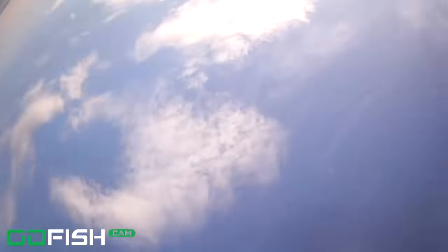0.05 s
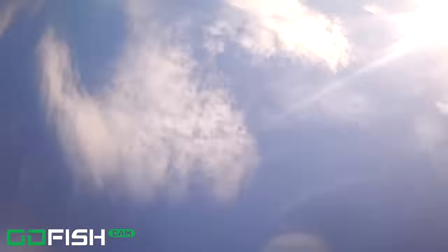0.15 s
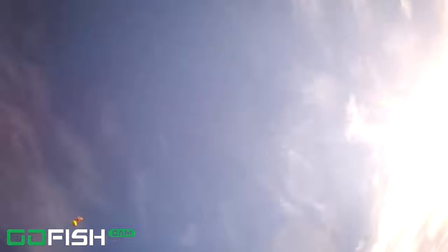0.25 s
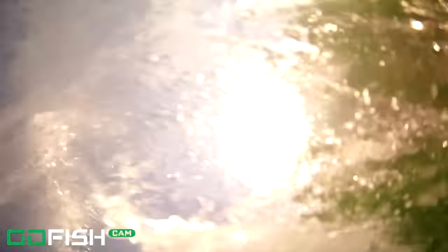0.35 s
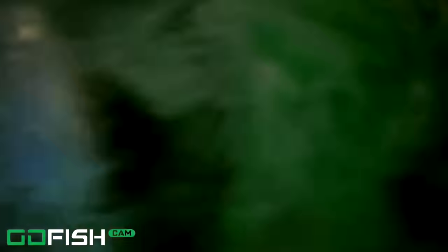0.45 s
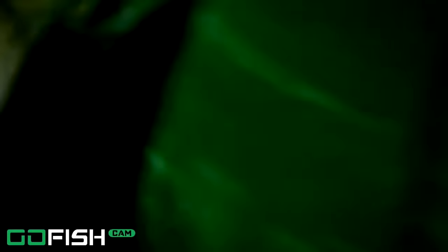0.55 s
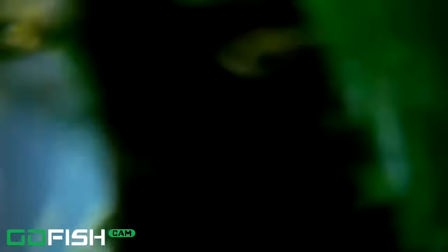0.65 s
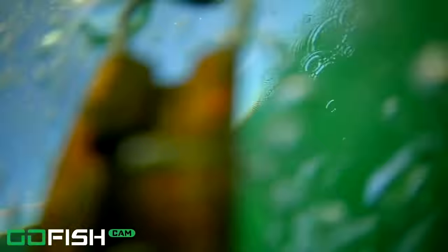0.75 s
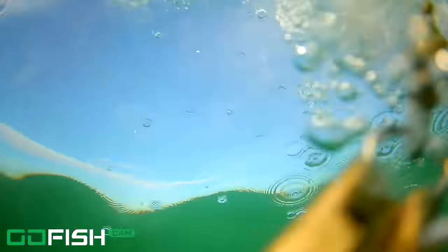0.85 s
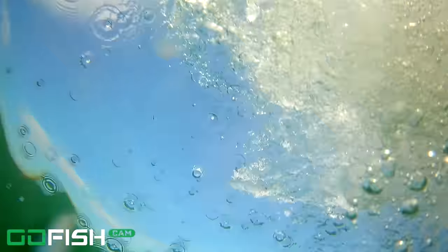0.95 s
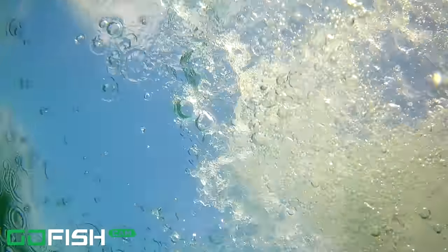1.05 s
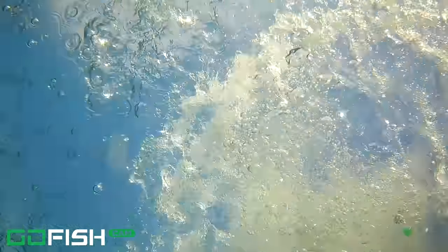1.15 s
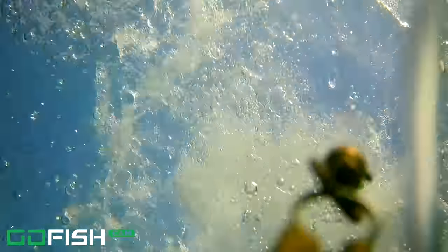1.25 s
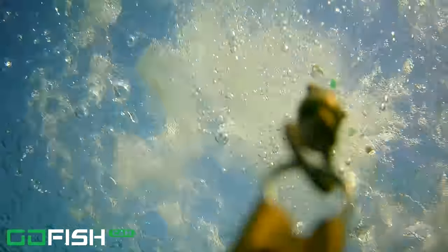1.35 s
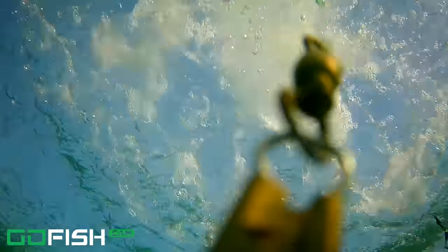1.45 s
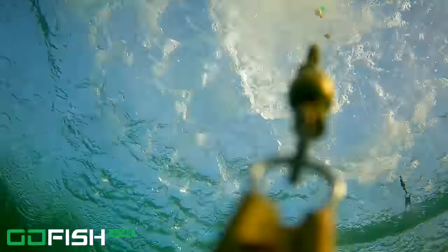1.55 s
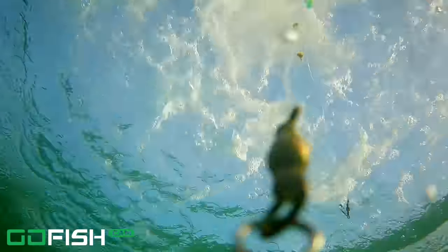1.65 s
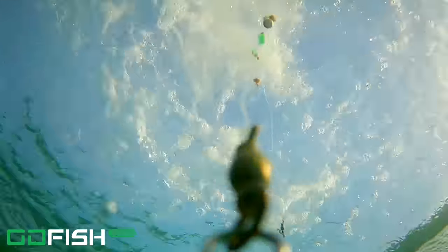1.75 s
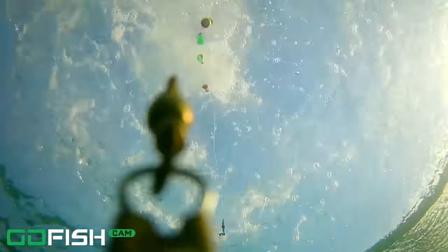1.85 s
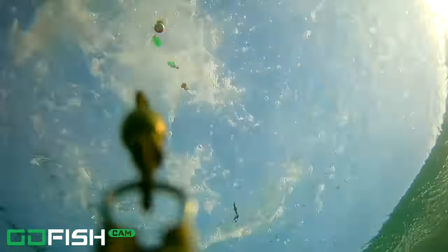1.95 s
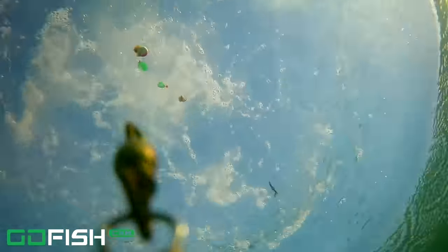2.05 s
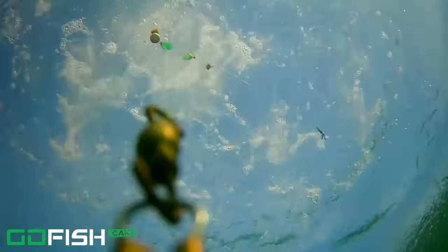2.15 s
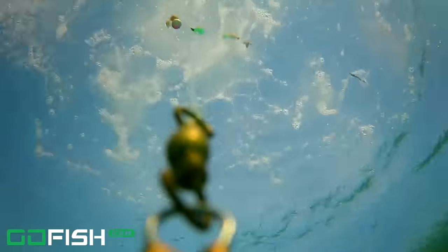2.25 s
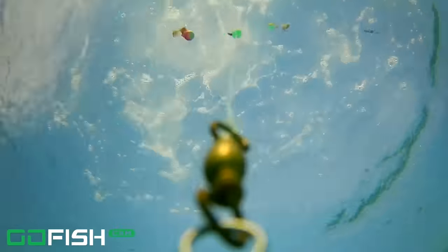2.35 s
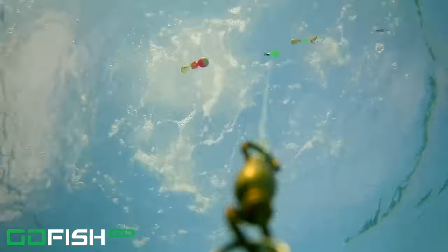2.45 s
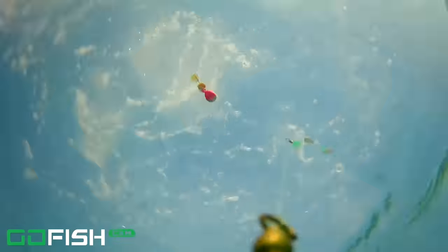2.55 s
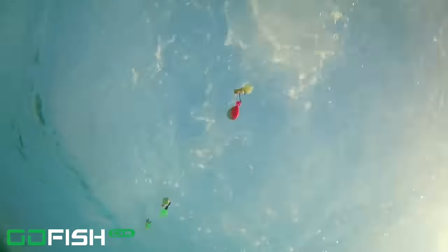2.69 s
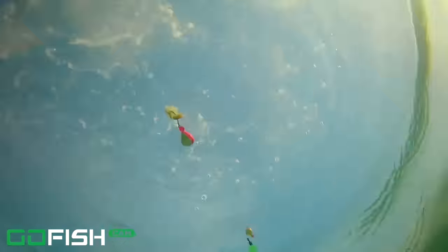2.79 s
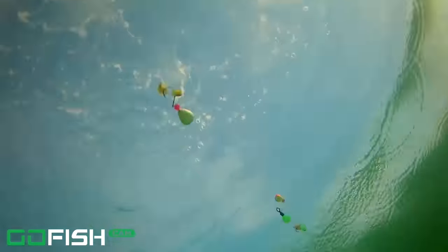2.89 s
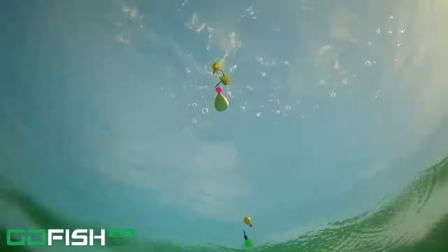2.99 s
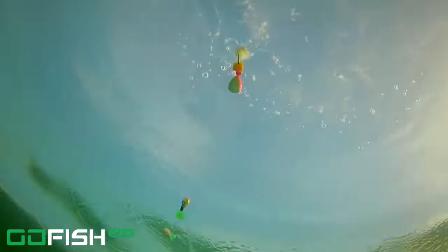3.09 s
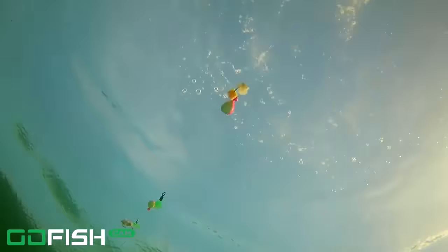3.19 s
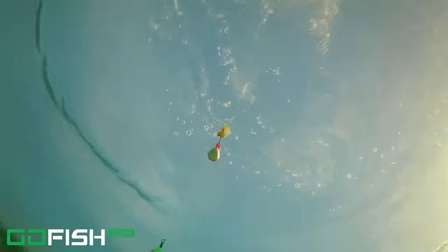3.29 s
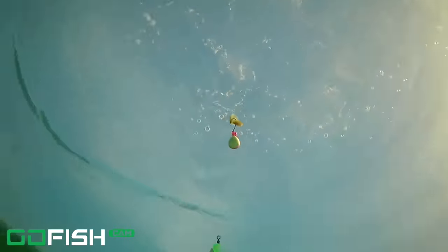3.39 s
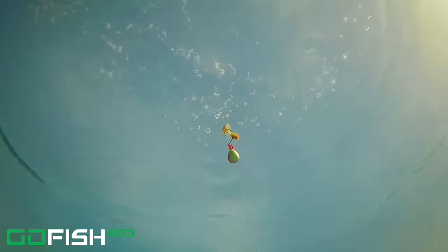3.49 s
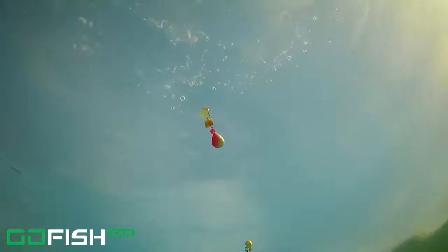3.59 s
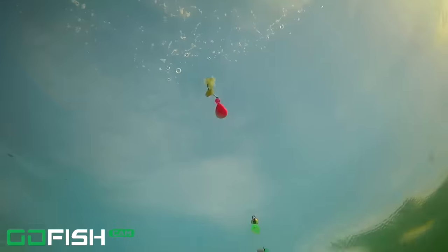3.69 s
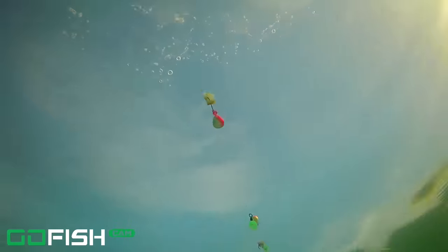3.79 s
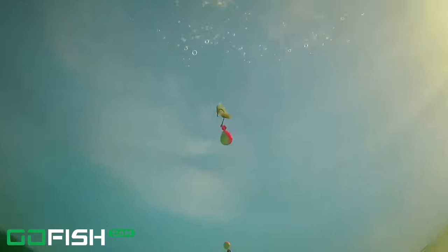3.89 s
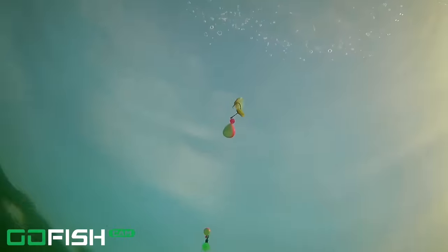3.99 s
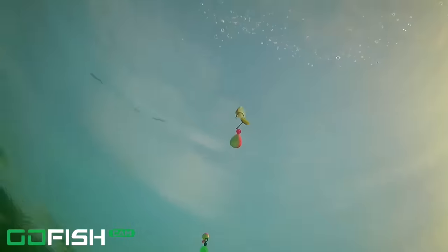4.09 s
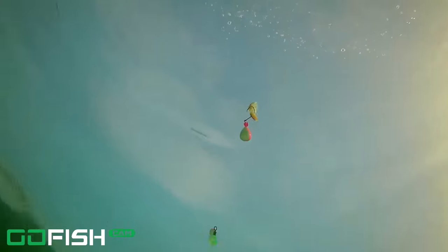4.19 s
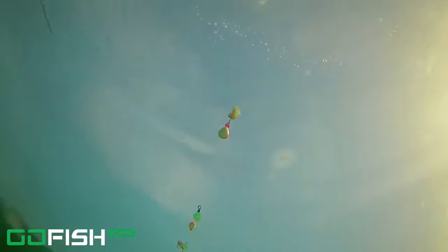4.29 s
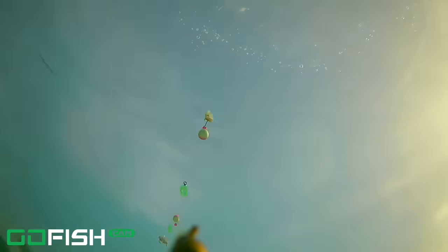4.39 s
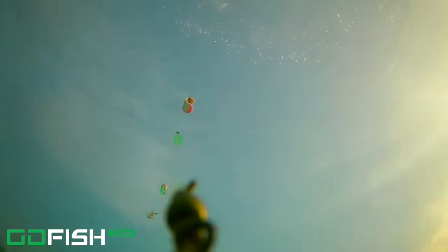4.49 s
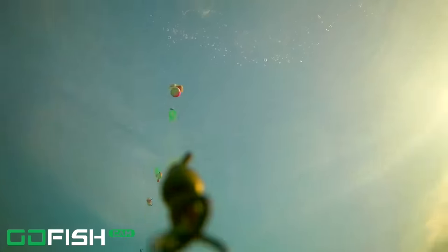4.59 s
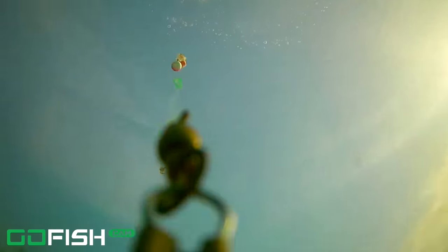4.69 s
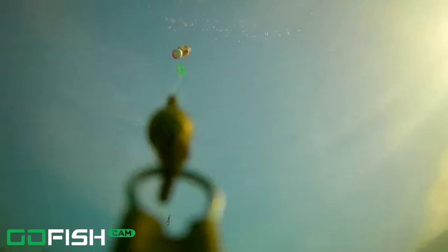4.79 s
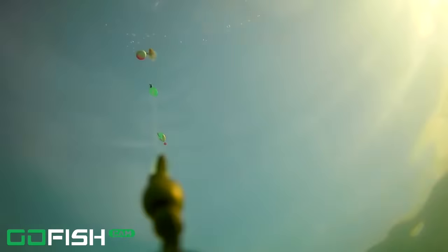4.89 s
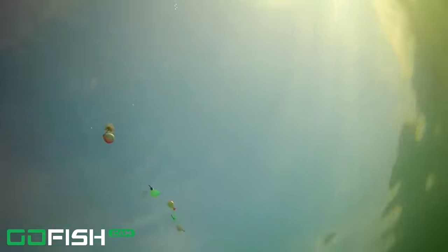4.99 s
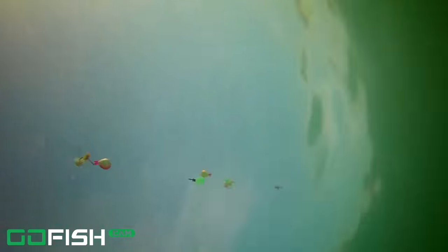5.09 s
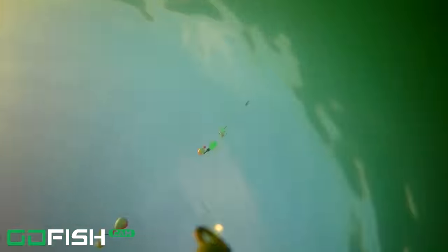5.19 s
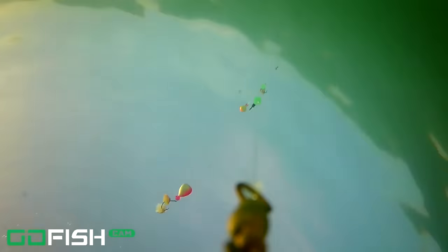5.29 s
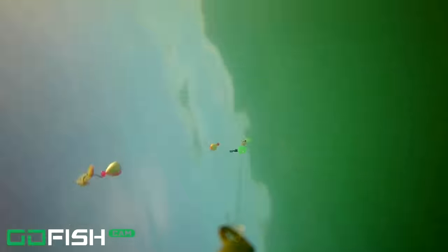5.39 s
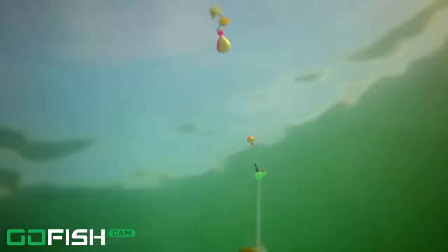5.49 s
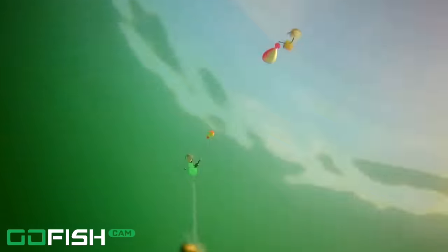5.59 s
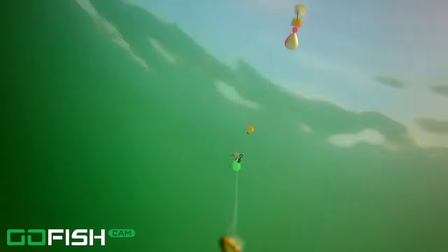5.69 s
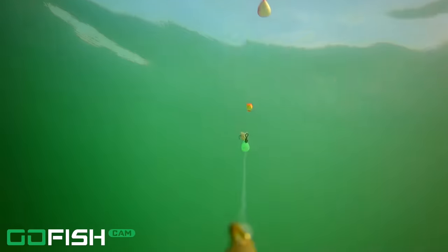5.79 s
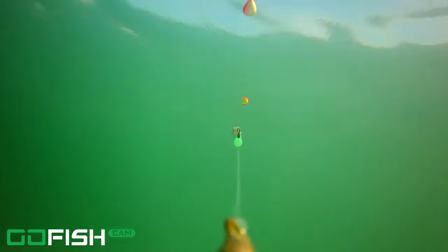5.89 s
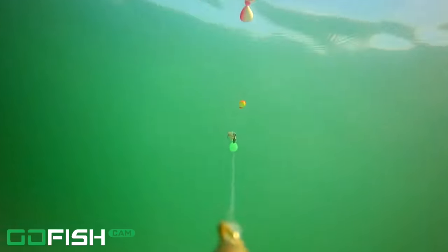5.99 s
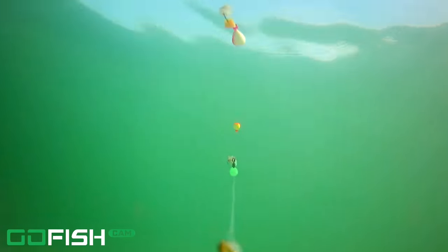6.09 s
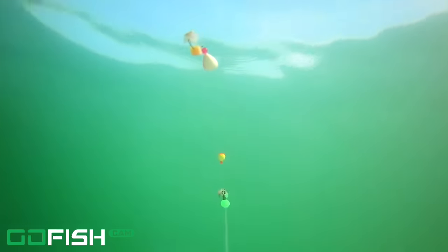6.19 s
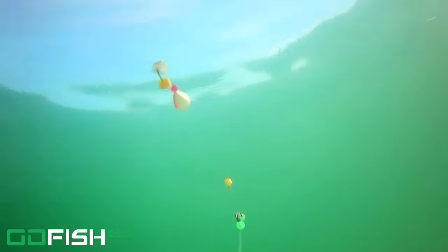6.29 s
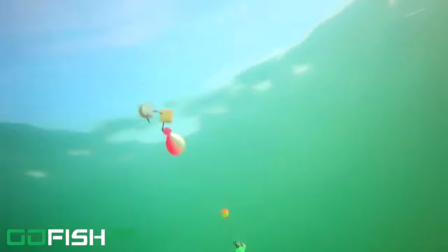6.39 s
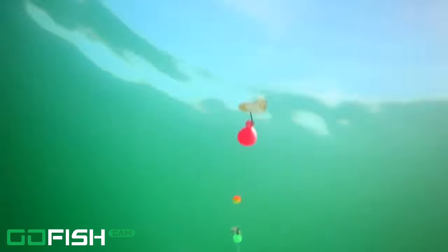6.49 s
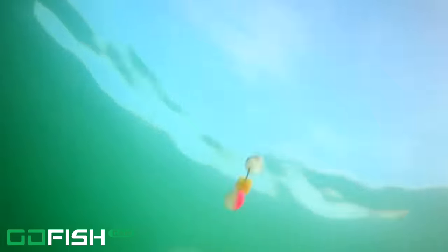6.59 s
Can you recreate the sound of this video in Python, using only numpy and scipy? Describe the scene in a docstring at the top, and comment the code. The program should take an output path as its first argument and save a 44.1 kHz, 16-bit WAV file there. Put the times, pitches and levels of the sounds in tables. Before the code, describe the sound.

Hard clinks and rushing air, a watery plunge with bubbling foam, then creaking line and small metal clicks heard from inside a sinking shell.

```python
"""Tackle and water knock on the shell of a small fishing camera, cast on a line into surf and left to sink.
Blows are short pings over a chatter that rings swivel or shell; the flight is a rush over a low rumble, the foam
a rush, a swarm of tiny bubbles and a low churn. A pitch-swept air pocket marks the plunge, damped rings the larger
bubbles; later the taut rig creaks in stick-slip impulses and its brass swivel scrapes on the shell. The microphone,
shut inside, hears little treble from outside over its own hiss; it backs off after loud sounds and hard blows clip."""
import sys
import numpy as np
from scipy import signal
from scipy.fft import rfft, irfft, next_fast_len
from scipy.io import wavfile
from scipy.ndimage import map_coordinates

SR = 44100
rng = np.random.default_rng(int(sys.argv[2]) if len(sys.argv) > 2 else 0)


def to_wav(s):
    """Save 16-bit WAV."""
    ch = np.atleast_2d(s).T  # columns
    pcm = np.round(np.clip(ch, -1, 1) * 32767)  # PCM
    wavfile.write(sys.argv[1], SR, pcm.astype(np.int16))


N = 293265

# resonances of the housing shell: f/Hz, width/Hz, level/dB
SHELL_MODES = [(730, 150, -13.5), (1283, 73, 1.5), (1555, 45, -1), (1932, 140, 1.5), (2107, 94, 5.5),
               (2330, 140, 1), (2767, 86, -1), (3204, 81, -3), (3450, 77, -13), (4390, 670, -14.5),
               (4860, 210, -12), (5150, 380, -18)]
# resonances of the swivel and its clip: f/Hz, width/Hz, level/dB
SWIVEL_MODES = [(1348, 270, -1.5), (1562, 95, 5), (1816, 240, -3), (2260, 116.78, 1.5), (2920, 130, -4.5),
                (3080, 200, -2), (3520, 240, -4), (3940, 12, -11.5), (4250, 68, -11.5), (4734.4, 200, -8),
                (4970, 560, -18)]
# spectrum of the rush and of the slap at the plunge: f/Hz, level/dB
FOAM_SPECTRUM = [(400, -36), (750, -33.5), (950, -8), (1200, 2.5), (1600, 3), (2300, -6), (3200, -3),
                 (4300, -2.5), (4900, -15), (5500, -14.5), (6300, -22), (9000, -19), (13000, -10)]
# small parts radiate little bass: f/Hz, gain/dB
SMALL_PARTS = [(100, -41), (500, -10.5), (900, -12), (1250, -0.5), (5000, 1), (7000, -1.5)]


def amp(db):
    """Decibels to gain."""
    return 10 ** (np.asarray(db) / 20)


def unit(x):
    """Scale to rms 1."""
    return x / np.sqrt(np.mean(x ** 2) + 1e-20)


def curves(rows):
    """One value per sample for each column after the time."""
    s, *columns = np.transpose(rows)
    return [np.interp(np.arange(N) / SR, s, column) for column in columns]


def loudness(rows):
    """Gain per sample from the last column (dB), silent outside the rows' span."""
    t = np.arange(N) / SR
    return amp(curves(rows)[-1]) * (t >= rows[0][0]) * (t <= rows[-1][0])


def wobble(rate):
    """A smooth random curve, rate knots a second."""
    knots = rng.standard_normal(int(N * rate / SR) + 4)
    return map_coordinates(knots, [np.arange(N) * rate / SR])


def add(track, s, sound):
    """Mix a sound into the track at time s."""
    part = track[max(round(s * SR), 0):][:len(sound)]
    part += sound[:len(part)]


def colour(x, points, size=4096):
    """Causal minimum-phase filter with the gain of (Hz, dB) points."""
    hz, db = np.transpose(points)
    gain = amp(np.interp(np.log(np.fft.rfftfreq(size, 1 / SR) + 1), np.log(hz), db))
    # folding the cepstrum forward in time makes the filter minimum-phase
    cepstrum = irfft(np.log(np.maximum(gain, 1e-6)))
    cepstrum[1:size // 2] *= 2
    cepstrum[size // 2 + 1:] = 0
    impulse = irfft(np.exp(rfft(cepstrum)))
    return signal.fftconvolve(x, impulse)[:N]


def resonate(x, modes, size=8192):
    """Ring a body's resonances, keeping the power of a white input."""
    f = np.fft.rfftfreq(size, 1 / SR)
    response = 0
    for k, (centre, width, db) in enumerate(modes):
        band = 1j * f * width / (centre * centre - f * f + 1j * f * width)
        response = response + (-1) ** k * amp(db) * band  # neighbours have opposite signs
    ring = irfft(response)
    return signal.fftconvolve(x, ring / np.linalg.norm(ring))[:N]


def blend(a, b, share):
    """Equal-power mix that gives b the stated share."""
    share = np.clip(share, 0, 1)
    return np.sqrt(1 - share) * a + np.sqrt(share) * b


def swell(start, length, db, rise, fade):
    """Gain that rises, holds and fades; rise and fade are the seconds for 20 dB."""
    t = np.arange(N) / SR
    before = np.maximum(start - t, 0) / rise
    after = np.maximum(t - start - length, 0) / fade
    return amp(db - 20 * (before + after))


def strokes(rows, rise, fade):
    """One gain curve for each (start, length, dB) row."""
    return np.array([swell(*row[:3], rise, fade) for row in rows])


def bubble(t, hz, t60, rise):
    """A damped ring scaled by its envelope peak, with a soft start and a pitch that rises as it fades."""
    envelope = amp(-60 * t / t60) * (1 - np.exp(-t * hz / 2)) ** 2
    envelope = envelope / envelope.max(axis=-1, keepdims=True)
    return envelope * np.sin(2 * np.pi * hz * t * (1 + rise * np.minimum(t / t60, 1)))


def grains(at, size, hz, cycles, rise):
    """Sum short rings that start at the given samples, each with its own size and pitch."""
    t = np.arange(SR // 80) / SR
    hz = np.clip(hz, 700, 6000)[:, None]
    rings = size[:, None] * bubble(t, hz, cycles / hz, rise)
    where = at[:, None] + np.arange(len(t))
    return np.bincount(where.ravel(), rings.ravel(), N)[:N]


def floor(hiss_db=-51.5, murmur_db=0, murmur_hz=525, drift=.05):
    """A faint hollow hum wavers in pitch and level near 500 Hz under an even hiss."""
    # spectrum of the hiss: f/Hz, level/dB
    hiss_spectrum = [(25, -59), (60, -28), (120, -21), (250, -7.5), (400, -5.5), (520, -3), (700, -7),
                     (1000, -11.5), (2000, -12.5), (3700, -14), (5500, -20), (10000, -19.5), (16000, -18)]
    # level of the hum: t/s, level/dB
    hum_level = [(.9, -60.5), (2.1, -56.5), (2.6, -63), (4.0, -64.5), (4.45, -56), (4.9, -66), (5.6, -56.5),
                 (6.65, -63.5)]
    hiss = amp(hiss_db) * unit(colour(rng.standard_normal(N), hiss_spectrum))
    phase = 2 * np.pi * np.cumsum(murmur_hz * (1 + drift * wobble(10))) / SR
    murmur = unit(wobble(85) * np.sin(phase) + wobble(85) * np.cos(phase))
    return hiss + amp(murmur_db + curves(hum_level)[0]) * murmur


def foam(count=6000, size_db=5.5, cycles=10, foam_db=0, breaking_db=-25, churn_db=2):
    """The rush of flight and splash, then foam: tiny ringing bubbles and a rush, with a low rumble or churn beneath."""
    # wind and line rushing in flight, the splash, then clouds of foam:
    # peak t/s, level/dB, rise/s and fade/s over 20 dB
    surges = [(.005, -27, 0.026, 0.2), (.07, -31.5, 0.038, 0.56), (0.207, -26.5, 0.16, .1),
              (0.314, -24.5, 0.026, 0.1), (.44, -19, 0.17, 0.18), (0.544, -14, 0.33, 0.1246),
              (.645, -23.5, 0.24, 0.19), (.755, -27, 0.2, .02), (.935, -31, 0.12, 0.04),
              (1.001, -29.5, 0.034, 0.09), (1.09, -32, 0.11, 0.14), (1.39, -45, 0.26, 0.77),
              (1.86, -43, .18, 0.14), (2.059, -45.5, .06, 0.2)]
    # low rumble in flight, then heavy water tumbling round the shell: start t/s, length/s, level/dB
    churns = [(0, 0.22, -48.5), (.47, 0.097, -32), (.6, .15, -39.5), (2.8, 0.06082, -55),
              (3.62, 0.057, -53.5), (5.42, 0.07, -52.5), (6.3, 0.11, -54)]
    # spectrum of the rumble and churn: f/Hz, level/dB
    churn_spectrum = [(50, -48), (130, -11.5), (300, 0.5), (600, 4.5), (900, -1), (1400, -22)]
    size = amp(size_db * np.minimum(rng.exponential(size=count), 2.6))
    pitch = 2250 * np.exp(0.25 * rng.standard_normal(count))  # Hz
    swarm = grains(rng.integers(0, N, count), size, pitch, cycles, rise=0.02)
    rush = unit(colour(rng.standard_normal(N) * amp(6.8 * wobble(250)), FOAM_SPECTRUM))
    level = np.max([swell(s, 0, db, rise, fade) for s, db, rise, fade in surges], axis=0)
    # loud surges lean toward the broad rush, gentle foam toward the bubbles
    mix = blend(unit(swarm), rush, level / (level + amp(breaking_db)))
    churn = unit(colour(rng.standard_normal(N) * amp(6.7 * wobble(60)), churn_spectrum))
    churn_level = amp(churn_db) * strokes(churns, rise=0.12, fade=0.051).max(0)
    return amp(foam_db) * level * mix + churn_level * churn


def ticks(start, end, rate, db, spread_db=3, spread=0.042):
    """Small contacts at random moments, as rows like those of the blows."""
    centre_hz, ring_db = 2180, -18
    count = round((end - start) * rate)
    rows = []
    for when, size, pitch in rng.random((count, 3)):
        hz = centre_hz * np.exp(spread * (2 * pitch - 1))
        rows.append((start + (end - start) * when, db + spread_db * (2 * size - 1), hz, ring_db))
    return rows


def clinks(contact_db=-.5, ring_db=1, ring_t60=0.03, chatter_rise=0.00064, grit=0.72, bounce_db=4,
           rebound_s=.0019, rebound_db=-6):
    """Each contact is a ping, shorter when harder, and a softer rebound, over a chatter that rings swivel or shell."""
    # clearest blows of tackle and water on the housing: t/s, level/dB, centre f/Hz, ring level/dB re ping
    blows = [(0.0863, -2, 3270, -13), (0.0896, -6.5, 3650, -33), (0.167, -18, 2050, -10),
             (0.1814, 2, 3760, -43), (0.2219, -1.5, 2980, -6.5), (0.2352, -3.5, 2550, -27),
             (.2573, -5.5, 3583, -31), (0.2683, -5.5, 2600, -29), (0.3249, 1, 2500, -20),
             (.3411, 2, 2450, -17), (0.3526, -4, 3380, -10), (0.3855, 0, 2500, -18), (.3875, 3, 3400, -24),
             (.444, -0.5, 2600, -3.5), (0.4461, 7, 2430, -25), (0.471, -12, 1940, 6),
             (0.4887, 3.5, 1870, -17), (0.529, 2.5, 2381, -11), (0.5361, 5.5, 3400, -18),
             (.5531, 5.5, 2440, -20), (.561, 1, 2340, -18), (.7357, -3.5, 3100, -17),
             (0.7689, 6, 2770, -21), (0.929, -14.5, 1610, -6), (.9765, -2, 2450, -20),
             (.9811, -11.5, 1760, -11), (1.164, -22, 2520, -20), (1.3088, -25, 2400, -16),
             (1.5814, -11, 2630, -15), (1.6335, -20, 2020, -20), (1.6579, -17, 3430, -21),
             (1.7594, -20, 2370, -19), (1.8074, -23, 2280, -19), (1.836, -25, 2320, -20),
             (2.0251, -20.5, 2110, -12), (2.2914, -13.5, 2380, -8.5), (2.3333, -7.5, 2670, -45),
             (2.348, -17.5, 1757, -28), (2.4282, -7, 2168, -9), (2.481, -13, 2280, -9),
             (2.6265, -8, 2464, -23), (2.7355, -5.5, 2513, -14), (2.9684, -12, 2092, -32),
             (3.0105, -7, 3125, -21), (3.0517, -7.5, 2185, -32), (3.0659, -8.5, 2370, -21),
             (3.1677, -19.5, 1895, -26), (3.3194, -15.5, 2514, -23), (3.539, -9.5, 2470, -19),
             (3.747, -19, 2080, -20), (3.9383, -15.5, 2082, -33.5), (4.1833, -15, 2165, -28),
             (4.2025, -12, 2410, -26), (4.213, -17.5, 2550, -21.5), (4.2497, -15.5, 1910, -6),
             (4.3317, -16, 2151, -17), (4.3436, -17, 1870, -20), (4.3531, -17, 2265, -12),
             (4.4218, -19.5, 1837, -6), (4.4357, -15, 1868, -11.5), (4.672, -13.5, 3020, 0.5),
             (4.6867, -1, 2455, -10.5), (4.6919, 0.5, 2232, -30), (4.7335, -12, 3220, -7),
             (4.746, -11, 2320, -21), (4.7611, -11.5, 2980, -10), (4.795, -6.5, 2850, -9),
             (4.8203, -15.5, 2473, -2), (4.853, -11.5, 1780, -40), (4.91, -4.5, 3490, -7),
             (5.0516, -5.5, 2056, -12), (5.0623, -7.5, 1797, -4), (5.094, -8, 2900, -6.5),
             (5.1405, -11.5, 2650, -2), (5.1098, -20, 3200, -10), (5.1531, -11.5, 4060, -7),
             (5.3826, -14, 2510, -30), (5.48, -7.5, 1507, -21), (5.5175, -2.5, 1960, -7),
             (5.5857, -14.5, 2570, -17), (6.1187, -15, 2200, -37), (6.2456, -14, 2220, -28),
             (6.2524, -13, 2180, -32), (6.2993, -16.5, 3600, -27), (6.3294, -10.5, 2130, -35),
             (6.3676, -11.5, 2050, -1.5), (6.403, -5, 2120, -3), (6.486, -14.5, 2100, -8),
             (6.4946, -12.5, 2070, 3), (6.5614, 2, 2330, -11), (6.6286, -3.5, 2430, -2)]
    # stray pops in the foam: from t/s, to t/s, pops a second, mean level/dB
    foam_pops = (1.15, 1.84, 13.5, -31.5)
    # small knocks of the loaded rig: from t/s, to t/s, knocks a second, mean level/dB
    rig_knocks = (2, 3.5, 10.5, -22)
    # the swivel comes to rest against the shell: t/s, share of contact 0-1
    lean = [(5.3, 0), (5.47, 1)]
    # swell time of a 0 dB blow; it shortens by a factor e for every contact_e_db more
    contact_s, contact_e_db = 0.00029, 27
    pings, chatter = np.zeros(N), np.zeros(N)
    t = np.arange(SR // 16) / SR
    for s, db, hz, tail_db in blows + ticks(*foam_pops) + ticks(*rig_knocks):
        u = t / (contact_s * np.exp(-db / contact_e_db))
        envelope = (u * np.exp(1 - u)) ** 1.76
        rebound_delay = rebound_s * (.5 + rng.random())
        for delay, loss_db in [(0, 0), (rebound_delay, rebound_db)]:
            phase = 2 * np.pi * (hz * t + rng.random())
            # random phase wander roughens the ping
            wander = np.interp(t, np.arange(0, .1, .0004), rng.standard_normal(250))
            ping = envelope * np.sin(phase + grit * wander)
            add(pings, s + delay, amp(db + contact_db + loss_db) * ping)
        uneven = np.interp(t, np.arange(0, .1, .002), rng.standard_normal(50))
        noise = unit(rng.standard_normal(len(t)) * amp(bounce_db * uneven))
        bounces = (1 - np.exp(-t / chatter_rise)) * noise
        add(chatter, s, amp(db + tail_db + ring_db - 60 * t / ring_t60) * bounces)
    ring = blend(resonate(chatter, SWIVEL_MODES), resonate(chatter, SHELL_MODES), curves(lean)[0])
    return colour(pings + ring, SMALL_PARTS)


def bubbles(rise=0.10797, bubbles_db=2):
    """Larger bubbles pinch off one by one, each a damped ring of rising pitch."""
    # single air bubbles: t/s, level/dB, starting f/Hz, t60/s
    single_bubbles = [(.389, -14.5, 725, 0.017), (.4, -9.5, 166, 0.045), (0.4134, 5, 1117, 0.013),
                      (.418, -23, 598, 0.16), (.472, -17.5, 434, 0.013), (0.474, -5.5, 1114, 0.016),
                      (.521, -16.5, 777, 0.012), (0.52, -34, 128, 0.22), (.5957, -11.5, 3850, 0.0031),
                      (0.619, -14.5, 1180, 0.0094), (.627, -31.5, 393, 0.037), (0.633, -18.5, 3740, 0.0047),
                      (.645, -19, 1880, 0.015), (.707, -29.5, 447, 0.026), (0.796, -7, 1354, 0.023),
                      (.814, -23, 3130, 0.014), (.858, -30, 4500, 0.013), (0.8706, -20, 1560, 0.0072),
                      (0.9038, -12.5, 1386, 0.0095), (0.9516, -18, 1473, 0.011),
                      (1.0451, -7.5, 3270, 0.006074), (.982, -21.5, 1610, 0.087), (1.077, -27, 1530, .08),
                      (1.075, -26, 2992, .012), (1.134, -23.5, 2540, 0.012), (5.062, -19, 1622, 0.06),
                      (5.092, -21, 1533, 0.063), (5.479, -21.5, 1314, 0.044)]
    out, t = np.zeros(N), np.arange(SR // 3) / SR
    for s, db, hz, t60 in single_bubbles:
        add(out, s, amp(db + bubbles_db) * bubble(t, hz, t60, rise))
    return out


def plunge(slap_db=-3, thump_db=2):
    """The shell slaps the water, is pushed back by it and drags down a pocket of air that rings."""
    # air pocket torn open, ringing lower as it grows, then collapsing: t/s, f/Hz, level/dB
    air_pocket = [(.3925, 4300, -25.5), (.394, 4012, 0), (.398, 2668, 10), (.403, 1862, 7), (.4052, 950, 4),
                  (.406, 119.4, 12), (.4075, 201, 8), (.409, 750, -1), (.413, 1017, -5.5), (.418, 595, -6)]
    # the water's push on the shell: t/s, level/dB
    thump_level = [(.394, -30), (.397, -10), (.407, -6), (.412, -4), (.42, -20), (.45, -61)]
    # spectrum of that push: f/Hz, level/dB
    push_spectrum = [(20, 16), (50, 3), (90, -12), (155, 11), (250, -14), (430, 4), (650, -5), (1200, -15)]
    hz, _ = curves(air_pocket)
    pocket = np.sin(2 * np.pi * np.cumsum(hz) / SR)
    slap = unit(colour(rng.standard_normal(N), FOAM_SPECTRUM))
    push = unit(colour(rng.standard_normal(N), push_spectrum))
    splash = loudness(air_pocket) * (pocket + amp(slap_db) * slap)
    return splash + amp(thump_db) * loudness(thump_level) * push


def slips(rate, scatter, size_db):
    """Stick-slip impulses of rms 1 at an uneven rate and of uneven size."""
    pace = rate * np.exp(scatter * wobble(150))
    # one impulse whenever the running count of slips passes a whole number
    lets_go = np.diff(np.floor(np.cumsum(pace) / SR), prepend=0) > 0
    size = amp(size_db * np.clip(rng.standard_normal(N), -2, 1.3)) / np.sqrt(rate)
    return unit(lets_go * size)


def twangs(train, centre_hz, spread, cycles):
    """Each slip sets off a short ring, its pitch scattered at random round a centre."""
    at = np.flatnonzero(train)
    pitch, sign = rng.standard_normal((2, len(at)))
    hz = centre_hz * np.exp(spread * pitch)
    rings = grains(at, train[at] * np.sign(sign), hz, cycles, rise=0)
    return unit(colour(rings, SMALL_PARTS))


def creak(creak_db=0, crisp_db=-27, waver_db=.8, scatter=2.8, firm_db=1.3, loose_db=9, firm_snap=0.17):
    """The loaded rig lets go in small slips, each a twang and a snap; looser pulls blur into sliding."""
    # the rig comes under load and slips: start t/s, length/s, level/dB, slips a second,
    # share of smooth sliding 0-1, share that rings the swivel 0-1
    pull_rows = [(2.25, .06, -44, 130, .25, .01), (2.35, .06, -38, 130, .2, 0),
                 (2.45, .13, -28, 190, .28, 0.01), (2.6, 0.26, -25, 220, .3, 0.07),
                 (2.86, 0.21, -28.5, 200, 0.21, 0.08), (3.08, 0.068, -34.5, 90, .15, 0.08),
                 (3.2, .1, -44, 100, .3, .06), (3.325, .085, -28.5, 95, .04, 0.1),
                 (3.421, .11, -25, 125, .02, 0.07), (3.538, .04, -26.5, 175, .06, 0.07),
                 (3.589, 0.092, -31, 280, .2, 0.05), (3.7, 0.11109, -35.5, 120, .17, 0),
                 (3.85, 0.056, -28.5, 260, .26, 0.06), (3.929, .26, -31, 290, .06, 0.03),
                 (4.221, 0.066, -39.5, 130, .35, .05), (4.405, 0.01514, -34, 130, .2, 0),
                 (4.566, 0.011, -42, 130, .2, 0), (4.693, 0.0047, -26, 170, .25, 0.15),
                 (4.734, 0.022, -31, 170, .25, 0.72), (4.83, .07, -35.5, 170, .3, 0.99),
                 (4.939, 0.16, -31.5, 220, .3, 0.87), (5.16, 0.098, -30, 320, .15, 0.13),
                 (5.292, 0.081, -39.5, 250, .2, 0.9), (5.384, 0.064, -31, 300, .15, .05)]
    # spectrum of the rig's snaps and rubbing: f/Hz, level/dB
    rig_spectrum = [(410, -68.5), (700, -27), (925, -26), (1260, -7.5), (2270, -2), (2400, 0.5),
                    (2740, -28), (3110, -9.5), (4110, -18), (4460, -30), (4790, -47), (5680, -33),
                    (6000, -16), (7800, -26), (13200, -120)]
    pulls = strokes(pull_rows, rise=.03, fade=.055)
    # the strongest pull at each moment sets the character
    rate, sliding, rattling = np.array(pull_rows)[pulls.argmax(0), 3:].T
    level = pulls.max(0) * amp(waver_db * wobble(16))
    # a firm grip slips evenly and crisply, a sliding one at random
    train = slips(rate, scatter * sliding, firm_db + loose_db * sliding)
    twang = twangs(train, centre_hz=2187, spread=0.075, cycles=22)
    snap = unit(colour(train, rig_spectrum))
    crackle = twangs(train, centre_hz=2705, spread=0.24, cycles=19)
    # the harder the slip, the more it snaps and crackles
    hardness = level ** 2 / (level ** 2 + amp(crisp_db) ** 2)
    snapping = 0.36 + hardness * (0.098 + firm_snap * np.exp(-sliding / 0.08))
    line = blend(blend(twang, snap, snapping), crackle, 0.4 * hardness ** 2)
    rub = unit(colour(rng.standard_normal(N) * amp(3.6 * wobble(200)), rig_spectrum))
    slipping = blend(line, resonate(train, SWIVEL_MODES), rattling)
    return amp(creak_db) * level * blend(slipping, rub, sliding)


def scrape(scrape_db=-1, twang_db=-7, waver_db=2):
    """The swivel lies against the shell and drags unevenly over it, ringing its resonances."""
    # strokes of the swivel dragging on the shell: start t/s, length/s, level/dB
    drags = [(5.555, 0.08, -33), (5.64, .14, -37), (5.83, 0.11, -44.5), (6.04, 0.096, -45),
             (6.27, .09, -32.5), (6.39, 0.03235, -22), (6.45, 0.069, -29), (6.6, 0.008, -30.5)]
    train = slips(220, scatter=0.93, size_db=5.0)
    ring = unit(resonate(train + amp(-5.0) * rng.standard_normal(N), SHELL_MODES))
    twang = twangs(train, centre_hz=2240, spread=0.212, cycles=24)
    level = strokes(drags, rise=0.074, fade=0.13).max(0) * amp(scrape_db + waver_db * wobble(40))
    return level * unit(ring + amp(twang_db) * twang)


def scene():
    """All but hiss and hum reach the microphone through the shell, which passes little treble."""
    outside = foam() + clinks() + bubbles() + plunge() + creak() + scrape()
    through_shell = [(4000, -1), (5350, -2.5), (5900, -24.5), (7500, -26), (9500, -10.5), (13000, -32.5)]
    inside = colour(outside, through_shell)
    return (inside + floor())[None]


def record(dry, ceiling=0.32, knee=0.1, recover_s=0.032):
    """Gain backs off after loud sounds, hard blows still overload; nothing is kept above the band limit."""
    top_hz = 16000
    keep = np.exp(-1 / (recover_s * SR))
    heard = signal.lfilter([1 - keep], [1, -keep], np.minimum(np.abs(dry), ceiling))
    clipped = np.clip(dry / (1 + heard / knee), -ceiling, ceiling)
    size = next_fast_len(N + SR // 2)
    in_band = np.fft.rfftfreq(size, 1 / SR) < top_hz
    return irfft(rfft(clipped, size) * in_band, size)[..., :N]


dry = scene()
out = record(dry)
to_wav(out)
```